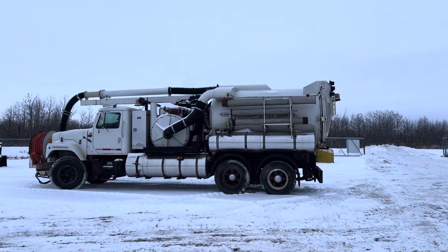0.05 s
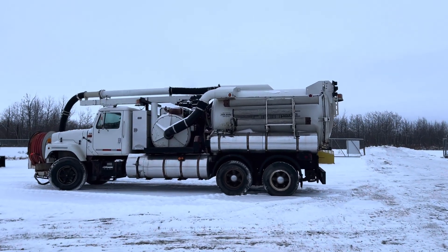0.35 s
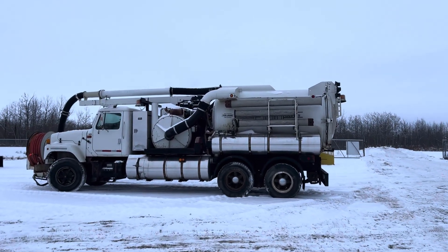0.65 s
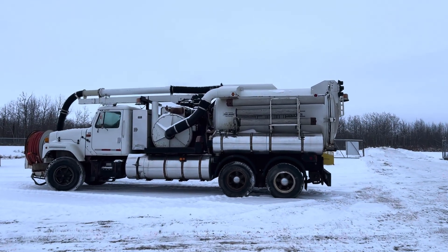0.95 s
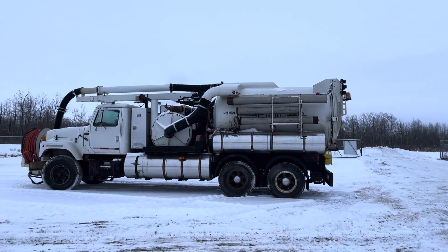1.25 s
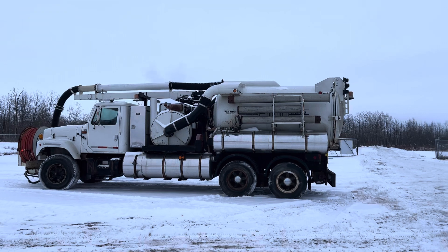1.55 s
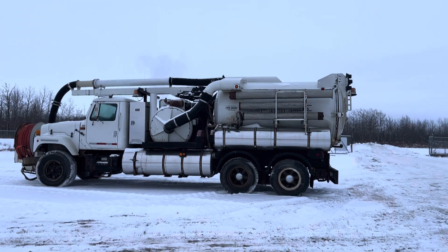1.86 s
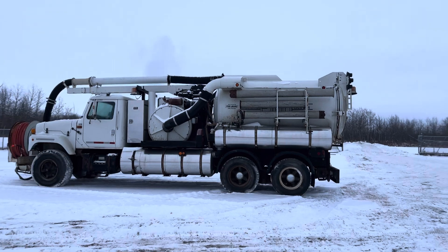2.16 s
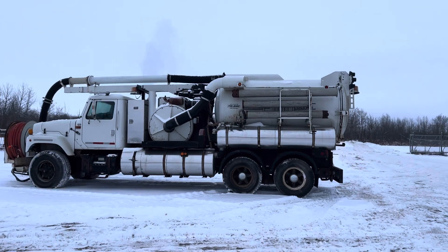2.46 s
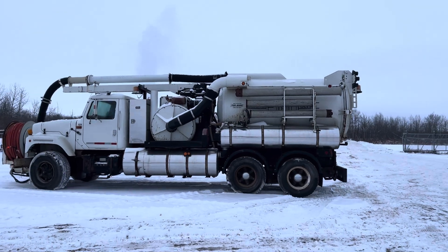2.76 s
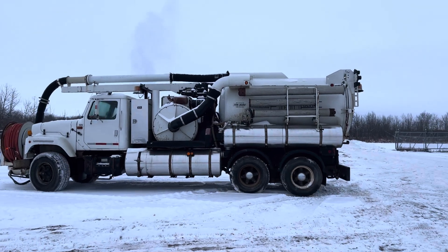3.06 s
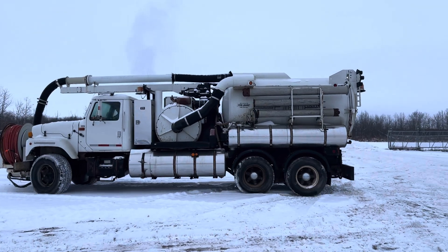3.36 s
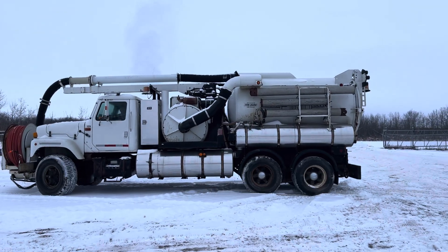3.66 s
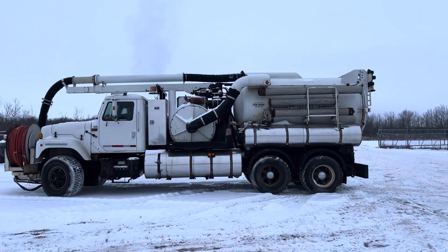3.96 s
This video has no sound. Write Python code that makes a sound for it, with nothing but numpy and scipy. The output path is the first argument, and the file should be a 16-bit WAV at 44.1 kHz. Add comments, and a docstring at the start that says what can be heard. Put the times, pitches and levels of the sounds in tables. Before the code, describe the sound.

Diesel truck engine rumbling and knocking, with a short air puff before the revs rise.

```python
"""A six-cylinder diesel truck idles on an open snowy lot, then pulls slowly away as the revs rise.
The exhaust booms at the firing rate over a lumpy rumble and roars under load.
Each firing knocks and rings the block, clacks an injector and rattles the valve gear.
An air valve lets out one short puff, and the chassis ticks now and then."""
import sys
import numpy as np
from scipy.fft import rfft, irfft, next_fast_len
from scipy.io import wavfile
from scipy.ndimage import map_coordinates

SR = 44100
rng = np.random.default_rng(int(sys.argv[2]) if len(sys.argv) > 2 else 0)


def generate_wav(sig):
    """Save sig (samples, or channels by samples) to the path in sys.argv[1] as 16-bit PCM at SR."""
    pcm = np.round(np.clip(np.atleast_2d(sig).T, -1, 1) * 32767).astype(np.int16)
    wavfile.write(sys.argv[1], SR, pcm)


N = 176400

# Each row: time in seconds, relative rumble level in dB, relative knock level in dB.
RUMBLE_KNOCK_DB = [(0, -28.5, -36), (.22, -31, -36), (.36, -27, -37.5), (.75, -28.5, -35),
                   (.95, -26.5, -34), (1.25, -25.5, -32.5), (1.8, -24, -32.5), (2.05, -25, -32),
                   (2.4, -24, -31), (2.85, -23, -31.5), (3.25, -26.5, -30.5), (3.7, -23, -29),
                   (4, -24, -29.5)]


def amp(db):
    return 10 ** (np.asarray(db) / 20)


def unit_rms(x):
    return x / np.sqrt(np.mean(x ** 2) + 1e-20)


def at_hz(points, hz):
    """Interpolate (Hz, value) points on a log axis."""
    knots_hz, values = np.transpose(points)
    return np.interp(np.log(hz + 1), np.log(knots_hz + 1), values)


def curves(rows):
    """One per-sample curve for each column after the time."""
    times_s, *columns = np.transpose(rows)
    return [np.interp(np.arange(N) / SR, times_s, column) for column in columns]


def wobble(knots_per_s):
    """Smooth random curve."""
    knots = rng.standard_normal(int(N * knots_per_s / SR) + 4)
    return map_coordinates(knots, [np.arange(N) * knots_per_s / SR])


def filtered(x, response):
    """Apply a complex response, given as a function of Hz."""
    size = next_fast_len(N + SR // 2)
    return irfft(rfft(x, size) * response(np.fft.rfftfreq(size, 1 / SR)), size)[..., :N]


def minimum_phase(gains_db):
    """Response that rings only after a blow."""
    cepstrum = irfft(np.log(amp(gains_db)))
    half = len(cepstrum) // 2
    return np.exp(rfft(np.r_[cepstrum[0], 2 * cepstrum[1:half], np.zeros(len(cepstrum) - half)]))


def stereo(pair, colour):
    """Colour a direct and a scattered signal and spread them left and right; rms 1."""
    # Each row: frequency in Hz, left-right likeness from 0 to 1.
    likeness = [(60, 1), (250, 0.93), (700, 0.81), (1200, 0.97), (2200, 0.5), (4500, 0.38), (8000, 0.15)]
    # Each row: frequency in Hz, left over right in dB.
    balance_db = [(60, 2.5), (93, 0.5), (140, -0.5), (220, -2.5), (340, 0), (530, -5.5), (820, 2),
                  (1260, -4), (1950, 2), (3000, 4), (4640, 2.5), (7170, 7)]
    # Each row: frequency in Hz, phase lead of the left in radians.
    lead_rad = [(0, 0), (200, .12), (430, .15), (690, 1), (1120, .95), (1460, 1.9), (1810, 3.4),
                (2240, 3.2), (2500, 1.6), (2760, 2.3), (4650, 6.4), (5250, 9), (5770, 13.4), (6720, 12.2),
                (7320, 12.2)]
    def blend(hz):
        angle = np.arccos(np.clip(at_hz(likeness, hz), 0, 1)) / 2
        return minimum_phase(at_hz(colour, hz)) * np.array([np.cos(angle), np.sin(angle)])
    def place(hz):
        side = np.array([[.5], [-.5]])
        return amp(side * at_hz(balance_db, hz)) * np.exp(1j * side * at_hz(lead_rad, hz))
    direct, scattered = filtered(pair, blend)
    return unit_rms(filtered(np.array([direct + scattered, direct - scattered]), place))


def firings(cycles, rise_s, t60_s, repeat, scatter_db, jitter_s, rush_db):
    """One noise burst per firing over a steady rush; each cylinder repeats a share of its burst."""
    # Each entry: relative strength of one cylinder in dB.
    cylinder_db = [0.76, 0.5, -1.2, 0.15, -0.49, -1.7]
    t = np.arange(SR // 8) / SR
    envelope = (1 - np.exp(-t / rise_s)) * amp(-60 * t / t60_s)
    signatures = rng.standard_normal((len(cylinder_db), 2, len(t)))
    rush = rng.standard_normal((2, N))
    out = np.zeros((2, N + SR))
    onsets = np.flatnonzero(np.diff(np.floor(cycles), prepend=-1))
    for k, onset in enumerate(onsets):
        cylinder = k % len(cylinder_db)
        fresh = rng.standard_normal((2, len(t)))
        burst = np.sqrt(repeat) * signatures[cylinder] + np.sqrt(1 - repeat) * fresh
        start = max(0, onset + int(rng.normal() * jitter_s * SR))
        gain = amp(cylinder_db[cylinder] + scatter_db * rng.normal())
        out[:, start:start + len(t)] += burst * envelope * gain
    return unit_rms(out[:, :N]) + amp(rush_db) * rush


def exhaust_boom(cycles, revs):
    """One smooth puff per firing, with wavering overtones; unequal cylinders add a lope at idle."""
    # Each row: time in seconds, level of the fundamental in dB.
    fundamental = [(0, -26.5), (.5, -39), (.88, -35.5), (1.07, -25.5), (1.45, -23.5), (1.75, -21),
                   (2.35, -16), (3.45, -16), (4, -13)]
    # Each row: time in seconds, second harmonic in dB, third harmonic in dB.
    overtones = [(0, -26, -32), (.25, -31, -34), (.5, -35, -33), (.78, -32, -35), (1.1, -40, -36),
                 (1.6, -43, -42), (2.3, -38, -40), (2.8, -35, -40), (3.2, -37, -38), (4, -35, -36)]
    lag_cycles, lope_order = .36, 5 / 3
    boom_db, = curves(fundamental)
    angle = 2 * np.pi * (cycles - lag_cycles)
    note = amp(boom_db + wobble(14)) * np.cos(angle)
    for order, level_db in enumerate(curves(overtones), 2):
        note += amp(level_db + 3.6 * wobble(18)) * np.cos(order * angle + .24 * wobble(7.6))
    lope = amp(-31.5 - 20 * revs) * np.cos(lope_order * angle)
    return note + lope


def exhaust_chugs(rise_s=.009):
    """An occasional harder firing thumps the pipe for a cycle or two."""
    # Each row: start in seconds, peak level in dB, pitch in Hz.
    thumps = [(.305, -24, 105), (.369, -24, 106), (.905, -20, 105), (1.451, -18, 114), (2.006, -16, 126),
              (2.089, -16, 134), (2.408, -18, 120), (3.393, -14, 121), (3.703, -14, 138)]
    out = np.zeros(N)
    for start_s, db, hz in thumps:
        t = np.maximum(np.arange(N) / SR - start_s, 0)
        envelope = (t / rise_s * np.exp(1 - t / rise_s)) ** 3
        out -= amp(db) * envelope * np.cos(2 * np.pi * hz * (t - rise_s))
    return out


def exhaust_rumble(cycles):
    """Low, lumpy noise of the exhaust pulses."""
    # Each row: frequency in Hz, relative gain in dB.
    colour = [(20, -56.5), (42, -18.5), (56, 4.5), (72, -4.5), (88, 0.5), (110, 0.5), (135, -5),
              (165, -6.5), (220, -15), (300, -21), (450, -30), (900, -70)]
    level_db, _ = curves(RUMBLE_KNOCK_DB)
    pulses = firings(cycles, rise_s=.0031, t60_s=.12, repeat=.35,
                     scatter_db=0, jitter_s=.00017, rush_db=-7.5)
    return stereo(pulses, colour) * amp(level_db - 1)


def pipe_roar(cycles):
    """The pulses roar in the pipe under load."""
    # Each row: frequency in Hz, relative gain in dB.
    colour = [(60, -54.5), (130, 6), (190, 6.5), (280, -3.5), (420, -8), (600, -13), (1200, -60)]
    # Each row: time in seconds, level in dB.
    levels = [(0, -43.5), (.9, -37), (1.05, -38.5), (1.85, -45.5), (2.02, -29.5), (2.4, -34.5),
              (2.6, -33.5), (3.05, -29), (3.3, -28), (3.5, -30.5), (3.7, -26), (4, -32)]
    level_db, = curves(levels)
    pulses = firings(cycles, rise_s=.0019, t60_s=.12, repeat=.35,
                     scatter_db=1.2, jitter_s=.0001, rush_db=-7)
    return stereo(pulses, colour) * amp(level_db)


def block_knock(cycles):
    """Combustion knocks the block, each cylinder in its own way."""
    # Each row: frequency in Hz, relative gain in dB.
    colour = [(100, -21.5), (300, -13), (530, -18), (620, -11.5), (690, -2.5), (780, -2.5), (860, -6),
              (980, -4), (1150, -4), (1270, -8.5), (1450, -11), (1600, -14), (1850, -22), (2200, -23.5),
              (2600, -25), (2950, -39), (5000, -51.5), (12000, -106.5)]
    _, level_db = curves(RUMBLE_KNOCK_DB)
    blows = firings(cycles, rise_s=.006, t60_s=.11, repeat=.93,
                    scatter_db=.6, jitter_s=.00002, rush_db=-3.5)
    return stereo(blows, colour) * amp(level_db + 1.31)


def block_ring(cycles, revs):
    """Firings ring the modes of block and covers; each mode's level follows the revs."""
    # Each row: frequency in Hz, width in Hz, level in dB at idle, at middle revs, at full revs.
    modes = [(650, 55, -43, -47, -45), (748, 30, -44, -36, -37.5), (1074, 30, -54, -42.5, -36.5),
             (1160, 80, -44.5, -36, -40), (1345, 50, -49, -43, -48), (1968, 65, -50, -50, -58),
             (2130, 110, -66, -52, -50), (2450, 120, -62, -50, -57), (5035, 170, -68, -60, -59)]
    middle_revs, waver_db = .6, .8
    blows = firings(cycles, rise_s=.005, t60_s=.15, repeat=.85,
                    scatter_db=.5, jitter_s=.00001, rush_db=-5)
    drive = stereo(blows, colour=[(1000, 0)])
    out = np.zeros((2, N))
    for hz, width_hz, *levels_db in modes:
        def resonance(f):
            band = 1j * f * width_hz / (hz * hz - f * f + 1j * f * width_hz)
            return band / (1 + (f / hz - hz / (f + 1)) ** 4)  # steeper skirts
        level_db = np.interp(revs, [0, middle_revs, 1], levels_db) + waver_db * wobble(9)
        out += unit_rms(filtered(drive, resonance)) * amp(level_db)
    return out


def valve_gear(cycles):
    """The valve gear rattles at each firing over a steady hiss."""
    # Each row: frequency in Hz, relative gain in dB.
    colour = [(800, -17.5), (1900, 12.5), (2500, -3), (3000, -0.5), (3800, -2), (5050, 1), (5600, 0.5),
              (6400, -2), (7200, -10), (8400, -20.5), (9500, -38.5)]
    # Each row: time in seconds, level in dB.
    levels = [(0, -50), (.24, -49), (.4, -50), (.85, -50.5), (1.02, -46.5), (1.35, -46.5), (1.58, -49),
              (1.9, -47), (2.6, -44.5), (3.15, -46.5), (3.45, -45.5), (4, -46.5)]
    level_db, = curves(levels)
    rattle = firings(cycles, rise_s=.002, t60_s=.084, repeat=.87,
                     scatter_db=1.2, jitter_s=.00001, rush_db=-1.5)
    return stereo(rattle, colour) * amp(level_db)


def injector_clack(cycles, revs):
    """One sharp clack per firing, slightly louder with revs."""
    # Each row: frequency in Hz, relative gain in dB.
    colour = [(900, -32), (1500, -6), (1950, 10.5), (2500, -2), (2950, -20.5), (5000, -18.5), (9000, -46)]
    clacks = firings(cycles, rise_s=.0012, t60_s=.019, repeat=.23,
                     scatter_db=1.8, jitter_s=.00005, rush_db=-7.5)
    return stereo(clacks, colour) * amp(-53.5 + 1.7 * revs)


def air_valve(open_s=.466, rise_s=.025, hold_s=.035, t60_s=.49, puff_db=-45):
    """Air seeps through a valve, which then opens, hisses briefly and runs empty."""
    # Each row of both: frequency in Hz, relative gain in dB.
    puff_colour = [(500, -25), (1800, 2.5), (2500, 3), (3300, -2), (3900, -7.5), (5300, -1), (6300, -2.5),
                   (7200, -7), (8300, -6.5), (9800, -30)]
    seep_colour = [(1500, -14), (2400, -15), (2720, 7.5), (3150, -11.5), (3750, -5), (4500, -7.5),
                   (6500, -8), (8000, -15), (10000, -51)]
    # Each row: time in seconds, level in dB.
    seep_levels = [(0, -56), (.12, -60), (.23, -51.5), (.36, -68), (.47, -55), (.7, -89.5)]
    seep_db, = curves(seep_levels)
    t = np.arange(N) / SR - open_s
    rise = np.sqrt(np.clip(t / rise_s, 0, 1))
    fall = amp(-60 * np.maximum(t - rise_s - hold_s, 0) / t60_s)
    puff = amp(puff_db) * rise * fall * stereo(rng.standard_normal((2, N)), puff_colour)
    seep = amp(seep_db) * stereo(rng.standard_normal((2, N)), seep_colour)
    return puff + seep


def metal_ticks(t60_s=.032, width_share=.07):
    """Small contacts in valve and chassis, each a short narrow ring."""
    # Each row: start in seconds, level in dB, pitch in Hz, left over right in dB.
    contacts = [(0.387, -42.5, 6540, 7), (0.461, -47, 6000, 6), (0.471, -41.5, 3000, -1),
                (1.2925, -45, 6000, 10), (1.957, -43, 5540, 8), (3.766, -39.5, 5300, 8)]
    out = np.zeros((2, N))
    for start_s, db, hz, pan_db in contacts:
        t = np.arange(N) / SR - start_s
        band = lambda f: 1 / (1 + ((f - hz) / (width_share * hz)) ** 2)
        ring = unit_rms(filtered(rng.standard_normal((2, N)), band))
        envelope = (t > 0) * amp(db - 60 * np.abs(t) / t60_s)
        out += ring * envelope * amp([[pan_db / 2], [-pan_db / 2]])
    return out


def scene():
    """One firing rate drives the whole engine; the exhaust trails the block."""
    # Each row: time in seconds, firing rate in Hz.
    speed = [(0.0, 33.64), (0.5, 33.24), (0.8, 32.94), (1.05, 36.09), (1.3, 40.92), (1.6, 41.73),
             (1.9, 43.39), (2.3, 45.1), (2.7, 48.09), (3.2, 49.36), (3.6, 50.13), (4.0, 50.94)]
    idle_hz, full_hz = 33, 50
    lead_s, offset_cycles = .043, .2
    firing_hz, = curves(speed)
    revs = (firing_hz - idle_hz) / (full_hz - idle_hz)
    pipe_cycles = np.cumsum(firing_hz) / SR
    block_cycles = pipe_cycles + lead_s * firing_hz - offset_cycles
    pipe_noise = exhaust_rumble(pipe_cycles) + pipe_roar(pipe_cycles)
    clatter = block_knock(block_cycles) + injector_clack(block_cycles, revs) + valve_gear(block_cycles)
    exhaust = exhaust_boom(pipe_cycles, revs) + exhaust_chugs() + pipe_noise
    return exhaust + clatter + block_ring(block_cycles, revs) + air_valve() + metal_ticks()


def record(dry):
    """Steep low-pass on the top treble."""
    cutoff_hz = 9300
    return filtered(dry, lambda hz: 1 / np.sqrt(1 + (hz / cutoff_hz) ** 60))


dry = scene()
out = record(dry)
generate_wav(out)
```